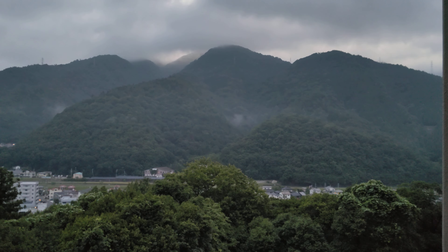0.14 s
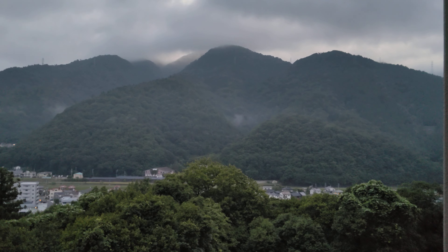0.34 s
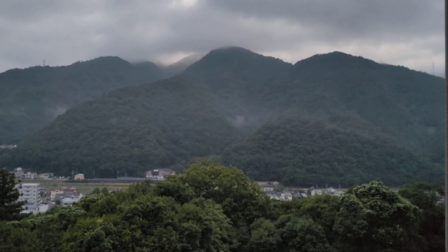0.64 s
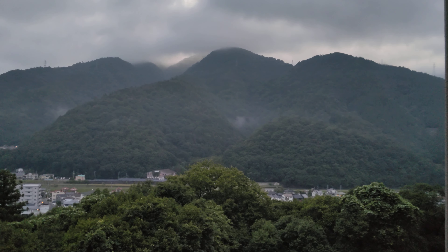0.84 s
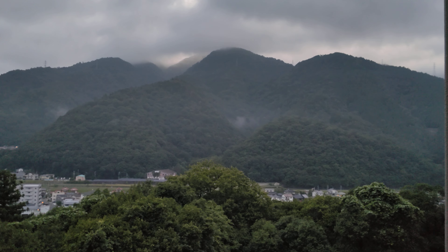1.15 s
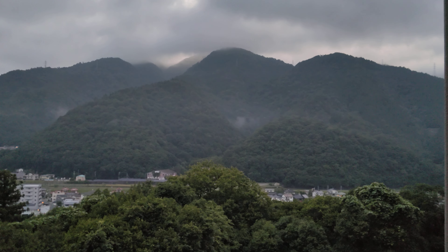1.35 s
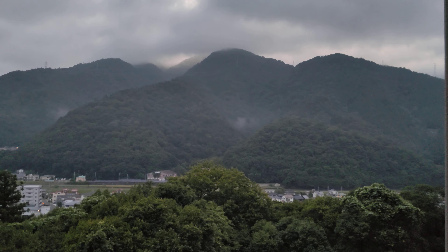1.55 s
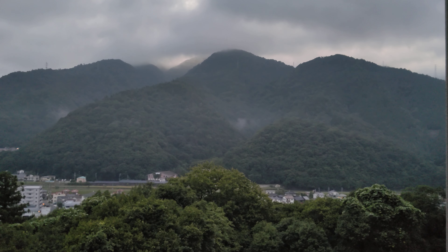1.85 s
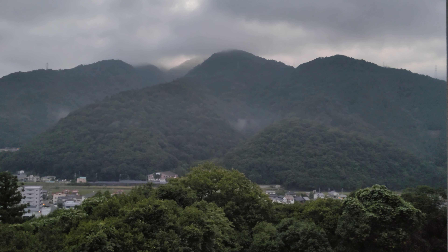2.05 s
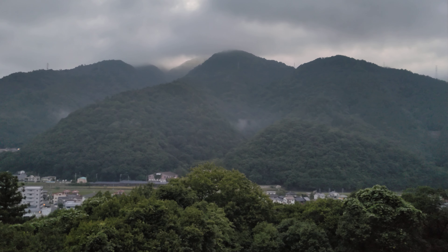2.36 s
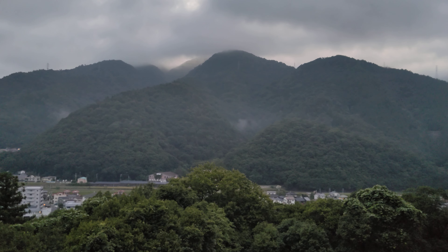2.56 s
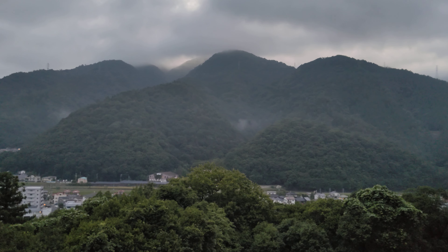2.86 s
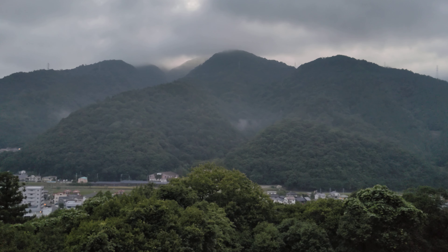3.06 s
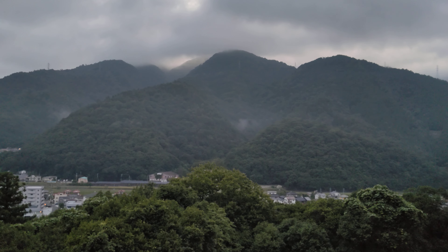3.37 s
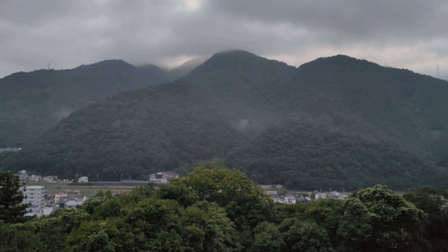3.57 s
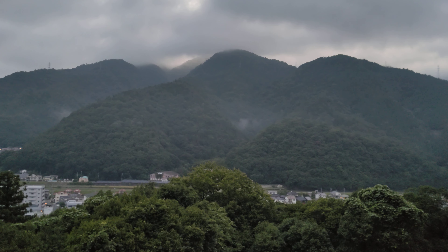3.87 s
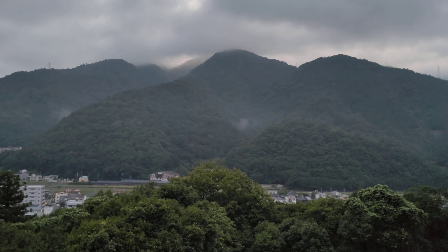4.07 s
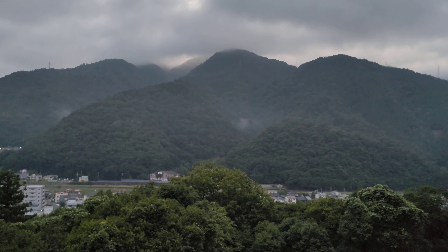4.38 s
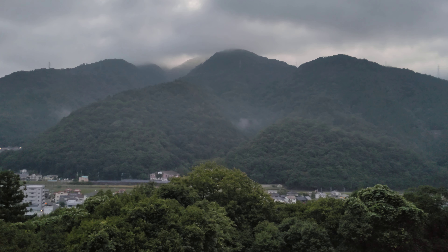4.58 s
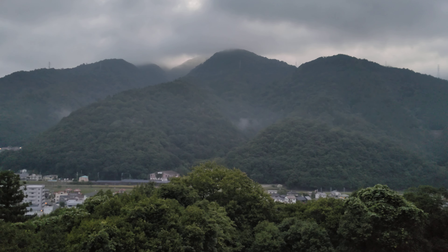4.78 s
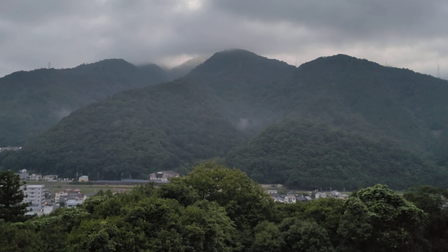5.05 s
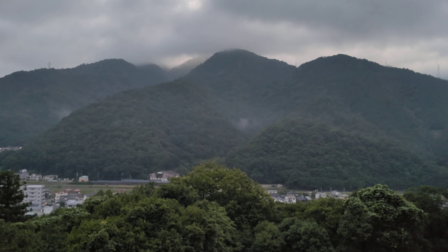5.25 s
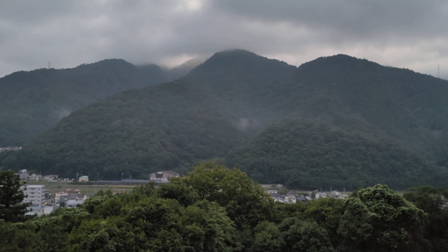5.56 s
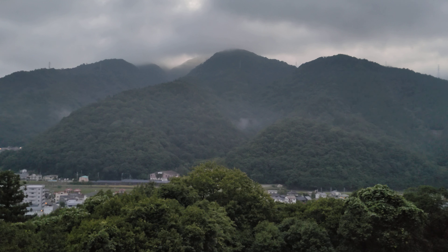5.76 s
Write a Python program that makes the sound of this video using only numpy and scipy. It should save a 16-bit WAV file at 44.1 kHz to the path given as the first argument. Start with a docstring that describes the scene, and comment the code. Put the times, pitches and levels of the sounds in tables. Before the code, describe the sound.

Outdoors above a wooded valley, many distant cicadas hold a throbbing, reedy drone under a fine high sizzle. Short, hoarse bird whistles dot the scene. Faint road noise, low machine hum and wind rumble lie beneath, with soft puffs thumping the stereo microphone. A rough buzz swells on the right around three seconds and breaks off at four; then a near cicada grows into loud, rasping syllables until the end.

```python
"""Cicadas above a valley town

A far chorus drones (detuned, throbbing harmonics) and sizzles (click trains coloured by a filter); late on,
a near cicada joins with a reedy call, harmonics pumped in syllables. Gliding whistles make the birds, steady
sines the machines, shaped noise the air and road; low pulses are puffs thumping the microphone."""
import sys
import numpy as np
from scipy import signal
from scipy.fft import rfft, irfft, next_fast_len
from scipy.io import wavfile

SR = 44100
rng = np.random.default_rng(int(sys.argv[2]) if len(sys.argv) > 2 else 0)


def digitize_waveform(pressure):
    """Quantize a signal to 16-bit integers and store it at the path in sys.argv[1].

    Rows of a 2-D input are taken as channels; values are limited to [-1, 1].
    """
    field = np.atleast_2d(pressure).T
    bounded = np.clip(field, -1, 1)
    quanta = np.round(bounded * 32767).astype(np.int16)
    wavfile.write(sys.argv[1], SR, quanta)


N = 261072
T = np.arange(N) / SR  # time [s]


def amp(db):
    """Level to gain: 20 dB is a factor of ten in amplitude."""
    return 10 ** (np.asarray(db) / 20)


def evened(x):
    """Normalization: scales a signal to rms 1."""
    return x / np.sqrt(np.mean(abs(x) ** 2) + 1e-20)


def follow(rows):
    """Linear interpolation: a (time, value) curve at every sample."""
    return np.interp(T, *np.transpose(rows))


def read(points):
    """Logarithmic frequency axis: a (frequency, value) table at every FFT bin."""
    hz, value = np.transpose(points)
    bin_hz = np.fft.rfftfreq(N, 1 / SR)
    return np.interp(np.log(bin_hz + 1), np.log(hz + 1), value)


def fading(rate_hz, order=8):
    """Narrow-band complex noise: a drifting gain and phase of rms 1, with a Gaussian spectrum."""
    size = next_fast_len(N // order + 2)  # computed at a rate lower by the order
    weight = np.exp(-.5 * (np.fft.fftfreq(size, order / SR) / rate_hz) ** 2)
    noise = rng.standard_normal(2 * size).view(complex)
    coarse = evened(np.fft.ifft(weight * noise))
    return np.interp(T, np.arange(size) * order / SR, coarse)


def wander(rate_hz):
    """Low-pass noise: smooth chance of rms 1 that changes about rate_hz times a second."""
    return evened(fading(rate_hz).real)


def band(hz, width_hz):
    """Modulation: slow complex noise on a carrier gives a noise band of rms 1."""
    return evened((fading(width_hz) * np.exp(2j * np.pi * hz * T)).real)


def pan(left_db):
    """Level difference between the ears: two gains for a left-minus-right level."""
    return amp(np.array([[left_db], [-left_db]]) / 2)


def forest(x, t60, order=44):
    """Multiple scattering by trunks and leaves: sparse taps, different for each ear, die by 60 dB in t60 s."""
    slots = np.arange(0, SR - order, order)
    at = slots + rng.integers(0, order, (2, len(slots)))  # one tap at random in each slot
    decay = np.exp(-np.log(1000) * at / SR / t60)
    taps = np.zeros((2, SR))
    np.put_along_axis(taps, at, rng.choice([-1., 1.], at.shape) * decay, 1)
    return signal.fftconvolve(x[None], taps / np.linalg.norm(taps[0]), axes=1)[:, :N]


def valley(swell_db=1.0, rise_db=2):
    """Partial coherence: distant traffic and leaves, most alike in both ears in the bass, slowly growing."""
    # spectrum that the slow rise ends on: (frequency [Hz], density [dB per Hz])
    air = [(30, -82), (100, -74.5), (145, -78.5), (260, -80), (400, -86.5), (550, -89.5), (1000, -88),
           (1350, -93.5), (1650, -95.5), (1900, -92), (2500, -101), (2730, -91.5), (3000, -92),
           (3250, -94.5), (3420, -101.5), (3750, -89), (5000, -101), (14000, -118)]
    # coherence of the two ears: (frequency [Hz], likeness [0-1])
    likeness = [(40, 0.8), (160, 1), (280, 0.88), (430, 0.57), (710, 0.23), (1500, 0)]
    # balance of the ears: (frequency [Hz], left minus right [dB])
    air_balance = [(500, -1), (1000, -0.5), (1500, -5), (3000, -2.5), (6000, -8)]
    left, other = rfft(rng.standard_normal((2, N))) * np.sqrt(SR / 2)
    same = np.clip(read(likeness), 0, 1)
    side = amp(read(air_balance) / 2)
    right = same * left + np.sqrt(1 - same ** 2) * other
    ears = np.array([left * side, right / side])
    level_db = swell_db * wander(15.0) + rise_db * (T / T[-1] - 1.0)
    return irfft(ears * amp(read(air)), N) * amp(level_db)


def road(hz=1330, width_hz=140, left_db=-3):
    """Band-limited noise: far tyre noise comes and goes."""
    # level before panning: (time [s], level [dB])
    road_level = [(0, -60.5), (2.27, -67), (3.25, -61), (4.58, -70), (5.3, -62.5), (5.9, -59.5)]
    tyres = np.array([band(hz, width_hz), band(hz, width_hz)])
    return pan(left_db) * amp(follow(road_level)) * tyres


def hum(waver_hz=0.64, waver_db=2.05, start_db=-3, growth_db_per_s=0.9):
    """Machine line spectrum: steady tones that waver on their way up the hill and grow throughout."""
    # tones before growth and panning: (frequency [Hz], rms level [dB])
    machine_tones = [(37, -53), (72.8, -53), (119.7, -61), (124.5, -63), (164, -68.5), (177.8, -64.5),
                     (239.5, -77.5), (355.5, -76), (382, -72.5)]
    tones = np.zeros(N)
    for hz, db in machine_tones:
        gain = amp(db + waver_db * wander(0.97))
        tones += gain * np.sin(2 * np.pi * np.cumsum(hz + waver_hz * wander(2.75)) / SR)
    return pan(-0.76) * np.sqrt(2) * tones * amp(start_db + growth_db_per_s * T)


def wind(lumps_db=1.5, calm_db=-5, rise_cycles=0.14, fall_cycles=0.27):
    """Turbulent pressure: eddies push on each port separately and slowly ease; stronger puffs give thumps."""
    # rumble before its slow level changes: (frequency [Hz], density [dB per Hz])
    eddies = [(3, -71), (10, -58.5), (24, -56), (35, -61), (55, -68.5), (80, -72), (130, -86), (400, -120),
              (2000, -160)]
    # thumps of air: (time [s], level [dB], frequency [Hz], share on the right [0-1])
    puffs = [(0.385, -23, 36.2, 0.86), (0.717, -29.5, 28, 0.9), (.86, -30, 30.2, 0.95),
             (1.071, -33, 47.7, 0), (1.507, -30, 45, 0.4), (1.561, -28, 50, 0.44), (1.614, -26.5, 45, 0.3),
             (2.446, -31, 36, 0), (2.821, -21.5, 46, 0.26), (2.974, -27.5, 42, 0.8), (3.287, -29, 55, 0.5),
             (3.927, -23, 40.6, 0.26), (4.224, -26, 30.2, 0), (4.276, -27.5, 40, 0), (4.449, -30, 36, 0),
             (4.747, -28, 58, 0)]
    calm_from_s, calm_by_s = 3.1, 6.4  # the rumble eases from one towards the other
    rumble = irfft(rfft(rng.standard_normal((2, N))) * amp(read(eddies)), N) * np.sqrt(SR / 2)
    breeze_db = np.interp(T, [calm_from_s, calm_by_s], [-1.5, calm_db])
    rumble *= pan(0.48) * amp(lumps_db * wander(1.3) + breeze_db)
    for s, db, hz, right in puffs:
        turns = (T - s) * hz
        width = np.where(turns < 0, rise_cycles, fall_cycles)
        thump = np.exp(-.5 * (turns / width) ** 2) * np.sin(2 * np.pi * turns)
        rumble += np.array([[1 - right], [right]]) * amp(db) * thump
    return rumble


def far_voice(hz, jitter, throb=0.38, throb_hz=8.4, order=(1, 2)):
    """Amplitude modulation: a far cicada's few harmonics throb, roughened by tymbal strokes and rib clicks."""
    stroke_hz, stroke_depth, click_depth, cycles_per_click = 84, .45, .22, 7
    pitch = hz * (1 + .002 * wander(3.04) + jitter * wander(169.2))
    angle = 2 * np.pi * np.cumsum(pitch) / SR
    pumping = 1 + throb * np.sin(2 * np.pi * (throb_hz * rng.uniform(.85, 1.15) * T + rng.random()))
    stroke_angle = 2 * np.pi * stroke_hz * rng.uniform(.7, 1.3) * T + 2 * wander(12)
    strokes = 1 + stroke_depth * np.cos(stroke_angle)
    clicks = click_depth * np.cos(angle / cycles_per_click)
    return pumping * strokes * np.array([(1 + clicks * (k > 1)) * np.cos(k * angle) for k in order])


def drone(low_hz=2025, high_hz=2215, jitter=0.018, first_db=-58.0, first_follow=0.59, count=10):
    """Incoherent summation: far cicadas, each on its own pitch and rhythm, smeared by the forest."""
    # effort, the level of the second harmonics before panning: (time [s], level [dB])
    effort = [(0, -50.5), (.7, -56), (1.1, -60), (2.9, -56.5), (3.7, -55), (4.4, -52), (5.9, -47.5)]
    first, second = sum(far_voice(hz, jitter) for hz in np.linspace(low_hz, high_hz, count))
    effort_db = follow(effort)
    # the fundamentals follow only part of the effort
    low_db = first_db + first_follow * (effort_db - effort_db.mean())
    low = amp(low_db) * evened(forest(first, t60=1.0))
    high = amp(effort_db) * evened(forest(second, t60=0.16))
    return pan(-4.5) * low + pan(-2.2) * high


def sizzle(tick_hz=480, flicker_db=.5, count=5):
    """Fusion of pulse trains: fast tymbal clicks of another kind of cicada blur into a frying hiss."""
    # level around which the hiss flickers: (time [s], level [dB])
    hiss_level = [(0, -47), (1.1, -48.5), (3, -49.5), (5.9, -46.5)]
    # relative spectrum of the hiss: (frequency [Hz], weight [dB])
    colour = [(3500, -65), (5000, -31), (5600, -10.5), (6300, -4.5), (6800, -5), (7600, 1.5), (8100, -0.5),
              (8700, -4), (9500, -22.5), (9950, -19), (10600, -15.5), (11200, -32), (11900, -27.5),
              (14000, -26.5)]
    # balance of the ears: (frequency [Hz], left minus right [dB])
    hiss_balance = [(5000, 22), (5900, -4.5), (6700, -6), (7400, 4), (8000, 3), (9500, 1.5)]
    ticks = np.zeros((2, N))
    for group in ticks:
        for _ in range(count):
            turns = np.cumsum(tick_hz * rng.uniform(.7, 1.3) * (1 + .08 * wander(40))) / SR
            group += np.diff(np.floor(turns), prepend=0)  # one click per whole turn
    # the first group echoes longer among the trees
    scattered = forest(ticks[0], t60=0.47) + forest(ticks[1], t60=0.14)
    ear_db = read(colour) + np.array([[1], [-1]]) * read(hiss_balance) / 2
    hiss = evened(irfft(rfft(scattered) * amp(ear_db), N))
    return hiss * amp(follow(hiss_level) + flicker_db * wander(30.0))


def buzzer(width_hz=85, left_db=-7):
    """Random amplitude in narrow bands: a single rough buzz swells on the right and breaks off."""
    # level before scattering and panning: (time [s], level [dB])
    buzz_level = [(2.6, -76), (3, -60.5), (3.7, -59.5), (4.02, -61), (4.1, -85)]
    # bands of the buzz: (frequency [Hz], relative level [dB])
    buzz_bands = [(5350, -9), (5870, 8.5), (6380, 5), (6900, -25)]
    voice = sum(amp(db) * band(hz, width_hz) for hz, db in buzz_bands)
    return pan(left_db) * forest(evened(voice) * amp(follow(buzz_level)), t60=0.19)


def neighbours(level_db=-2, first_db=-7, wet_db=-2):
    """Direct sound over scattered: nearer singers stand out of the drone as thin, slowly sinking strands."""
    # calls at middle distance: (start [s], length to half level [s], starting pitch [Hz],
    # sinking [Hz per s], relative level [dB], fifth harmonic relative to the second [dB])
    calls = [(-.3, 1.2, 2178, 22, -51, -35), (-.3, 2.5, 2020, 24, -57, -14), (-.3, 1.2, 2078, 5, -55, -35),
             (-.3, 2.4, 2128, 4, -58, -35), (.2, 3.05, 2226, 8, -57.5, -35), (.9, 1.45, 2157, 2, -55, -35),
             (.9, 1.2, 2054, 3, -58.5, -35), (3.33, .8, 2200, 62, -53.5, -35),
             (3.3, 1.15, 2112, 14, -55, -20), (3.6, .6, 2062, 20, -56, -35)]
    attack_s, release_s = .09, .25
    song = np.zeros(N)
    for start, length, hz, sink, db, fifth_db in calls:
        age = T - start
        fade = np.clip((length - age) / release_s + .5, 0, 1)
        envelope = np.clip(age / attack_s, 0, 1) * fade
        first, second, fifth = far_voice(hz - sink * age, jitter=.009, order=(1, 2, 5))
        voice = amp(first_db) * first + second + amp(fifth_db) * fifth
        song += amp(db + level_db) * envelope * voice
    return pan(-3.5) * (song / 2 + amp(wet_db) * forest(song, t60=.25))


def bird(direct_db=-10.5, wet_db=-9.5):
    """Frequency glides: short whistles from within the trees; hoarseness shakes their pitch and level."""
    # whistles: (middle time [s], time from middle to 1/e^2 [s], relative level [dB],
    # middle pitch [Hz], glide [Hz per s])
    chirps = [(0.158, .04, -53, 3670, -7000), (0.287, .025, -54, 5150, -16000),
              (0.429, 0.04, -50, 3000, -8500), (0.918, 0.023, -44, 3060, -11000),
              (0.97, 0.089, -55, 4830, 5000), (1.444, 0.061, -49, 3050, -5500),
              (1.684, .035, -54, 4980, 15000), (1.856, .045, -53, 3500, 4500),
              (1.932, 0.051, -50, 3340, -8500), (2.015, .05, -54, 5000, 6500),
              (2.27, 0.028, -60, 3270, -35000), (2.345, 0.043, -48, 4850, 12000),
              (2.504, 0.042, -54, 3130, -5000), (2.805, 0.049, -49, 3570, 7502),
              (3.027, 0.059, -52, 3140, -6500), (3.54, .04, -61, 5000, 8000), (4.34, .06, -54, 3600, 2500),
              (5.106, .035, -56, 3200, -7000), (5.3, .025, -54, 5040, 7998), (5.49, .025, -45, 5000, 8003),
              (5.738, 0.039, -52, 3070, -8000)]
    # low whistles are clearer, high ones hoarse and broken: (pitch [Hz], hoarseness as rms phase [rad])
    hoarseness = [(3100, .65), (5000, 1.3)]
    waver, flutter = wander(170), wander(60)
    song = np.zeros(N)
    for s, length, db, hz, glide in chirps:
        near = abs(T - s) < 2 * length
        t = T[near] - s
        hoarse = np.interp(hz, *np.transpose(hoarseness))
        broken = evened(abs(1 + hoarse * flutter[near]))
        bell = np.exp(-2 * (t / length) ** 2)
        phase = 2 * np.pi * (hz + glide * t / 2) * t + hoarse * waver[near]
        song[near] += amp(db) * broken * bell * np.sin(phase)
    return pan(-3) * (amp(direct_db) * song + amp(wet_db) * forest(song, t60=.25))


def syllables(call_start_s=4.168, gap_s=.109, gap_growth_s=.00114):
    """Slowing rhythm: rows (time [s], level [dB]) of the near cicada's pumping as it grows to full song."""
    full_db, first_softer_db, crescendo_s = -38, 33, 0.27
    n = np.arange((T[-1] - call_start_s) / gap_s)
    since = n * gap_s + n ** 2 * gap_growth_s / 2
    level_db = full_db - first_softer_db * np.exp(-since / crescendo_s)
    return np.transpose([call_start_s + since, level_db])


def swells(width_s):
    """Gaussian envelope: one bell-shaped swell on each syllable of the near cicada."""
    return sum(amp(db) * np.exp(-.5 * ((T - s) / width_s) ** 2) for s, db in syllables())


def near_cicada(stroke_hz=84, sag_hz=38, spread_hz=48, grit=0.14, click_db=-23, wet_db=-15,
                scrape_db=-29, scrape_hz=4700, scrape_width_hz=420):
    """Modulated resonance: tymbals ring the hollow abdomen; strokes and rib clicks add a rasp of side lines."""
    # harmonics 1, 2, ..: (clear tone [dB], rasp [dB], left minus right [dB], share held between
    # syllables [ratio], lead on the beat [s], phase by which the left ear lags [rad])
    harmonics = [(-3, -18, -4, .1, 0, 1.3), (-4.8, -11.5, -1, .48, -.012, .1),
                 (-16.5, -19, -5, .65, -.003, 1.2), (-13, -15, -1, .75, .005, .3),
                 (-19.5, -20, 0, .6, 0, 0), (-40, -32.5, -2, .8, -.005, 0)]
    # pitch lifts as it warms up, then sags: (time [s], fundamental [Hz])
    pitch = [(4.2, 2104), (4.55, 2112), (4.72, 2138), (4.85, 2150), (5.15, 2146), (5.4, 2126), (5.7, 2123),
             (5.92, 2112)]
    beat_s, sustain_s = .015, .044  # widths of the beat and of the sustain around it
    upbeat_s, upbeat_lead_s, upbeat_share = .008, .035, .38  # a short upbeat just before each beat
    # warming up: while cold the second harmonic dominates and the others are duller by their distance
    warm_at_s, warm_s, cold_dull_db = 4.61, .065, 5  # half effort, time scale, dB per harmonic
    jitter, rustle, flutter_db, cycles_per_click = .0009, .3, .5, 7
    upbeats = np.interp(T + upbeat_lead_s, T, swells(upbeat_s))
    beats = swells(beat_s) + upbeat_share * upbeats
    sustain = swells(sustain_s)
    tilt_db = -cold_dull_db / (1 + np.exp((T - warm_at_s) / warm_s))
    angle = 2 * np.pi * np.cumsum(follow(pitch) * (1 + jitter * wander(45))) / SR
    stroke = np.exp(2j * np.pi * np.cumsum(stroke_hz * (1 + .08 * wander(14))) / SR)
    click = np.exp(1j * (angle / cycles_per_click + wander(10)))
    steps = np.arange(-6, 3)
    ears = np.zeros((2, N))
    for ear, side in zip(ears, (1, -1)):  # left, right
        side_lines = np.array([stroke ** m * np.exp(2j * wander(6)) for m in steps])
        leaves = rustle * wander(2)  # stirring leaves shift the phase on each path
        for k, (tone_db, rasp_db, left_db, hold, lead_s, lag) in enumerate(harmonics, 1):
            # the pitch sags within each stroke, so the side lines lie mostly under the harmonic
            offset = (steps * stroke_hz + k * sag_hz) / (k * spread_hz)
            weights = (steps != 0) / (1 + offset ** 2) ** 2
            rasp = evened(evened(weights @ side_lines) + grit * fading(90 * k))
            ribs = amp(click_db) * (k - 1) * (1 / click + click / k)
            # the fundamental throbs deeply, while the overtones buzz on between syllables
            pumping = np.interp(T + lead_s, T, beats) + sustain * hold
            drive = amp(tilt_db * (abs(k - 2) - 1) + side * left_db / 2 + flutter_db * wander(8.6))
            voice = amp(tone_db) * (1 + ribs) + amp(rasp_db) * rasp
            carrier = np.exp(1j * (k * (angle + leaves) - side * lag / 2))
            ear += pumping * drive * (voice * carrier).real
        # a dry scrape in each syllable
        ear += amp(scrape_db) * (beats + sustain / 2) * band(scrape_hz, scrape_width_hz)
    return ears + amp(wet_db) * forest(ears[0], t60=0.77)


def scene():
    """Superposition: the sound pressures of all sources add."""
    background = valley() + road() + hum() + wind()
    chorus = drone() + sizzle() + buzzer() + neighbours()
    return background + chorus + bird() + near_cicada()


def record(dry, edge_hz=14200):
    """Band limitation: the recorder's linear-phase low-pass filter."""
    lowpass = signal.firwin(511, edge_hz, window=("kaiser", 9), fs=SR)
    return signal.oaconvolve(dry, lowpass[None], "same")


dry = scene()
out = record(dry)
digitize_waveform(out)
```